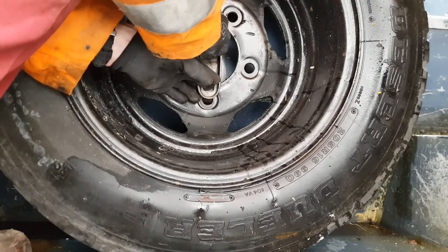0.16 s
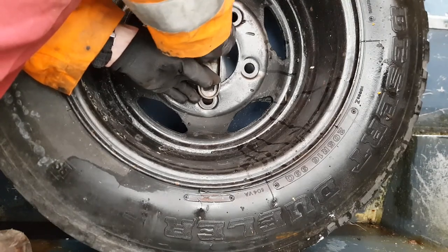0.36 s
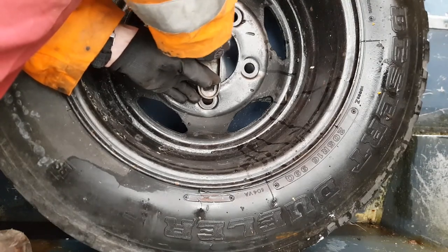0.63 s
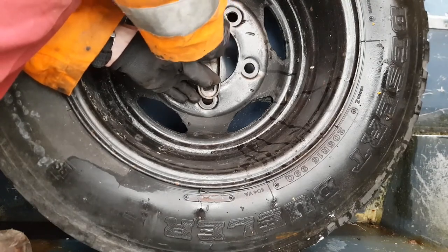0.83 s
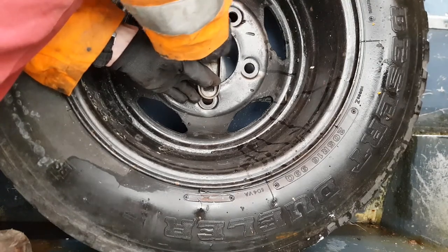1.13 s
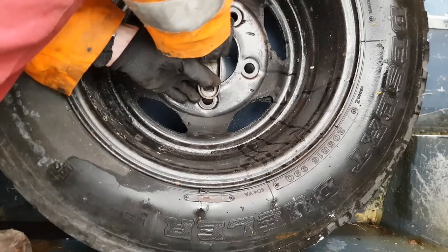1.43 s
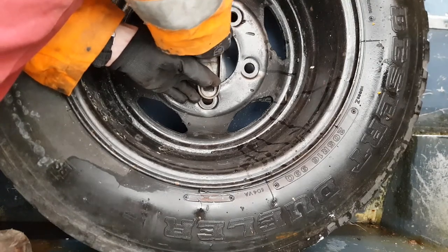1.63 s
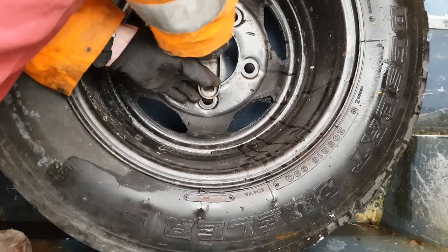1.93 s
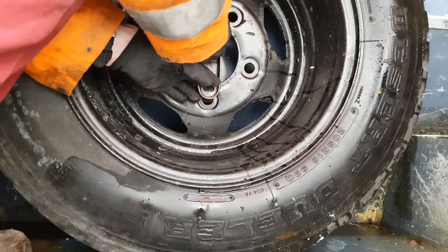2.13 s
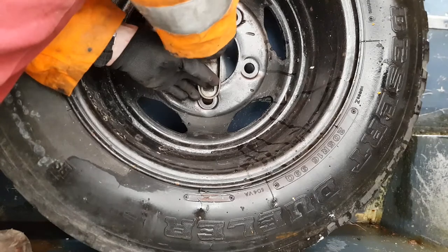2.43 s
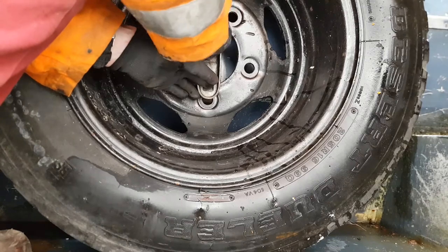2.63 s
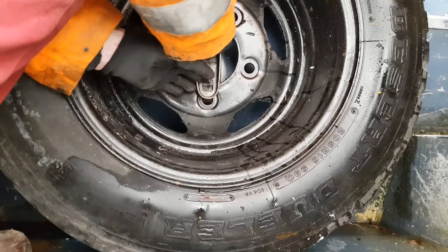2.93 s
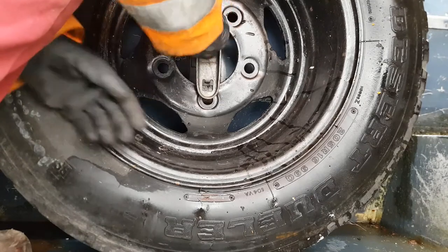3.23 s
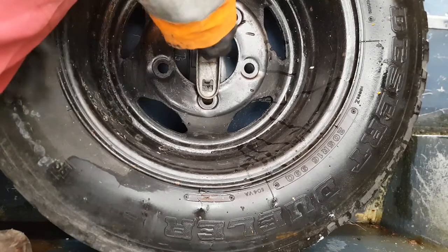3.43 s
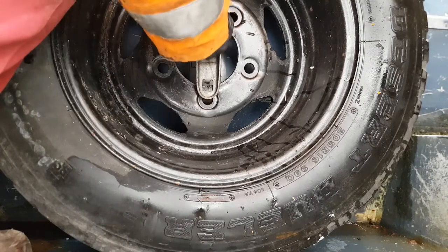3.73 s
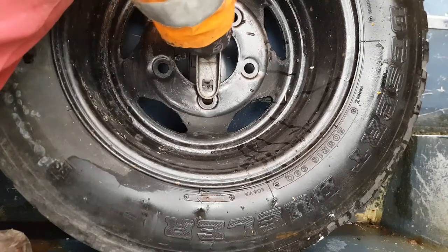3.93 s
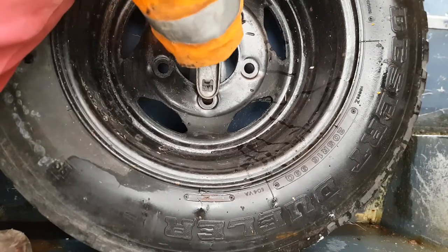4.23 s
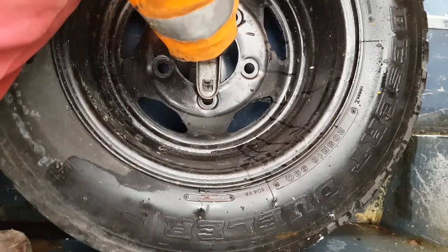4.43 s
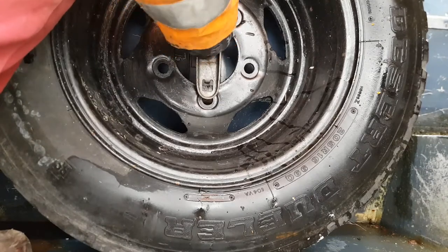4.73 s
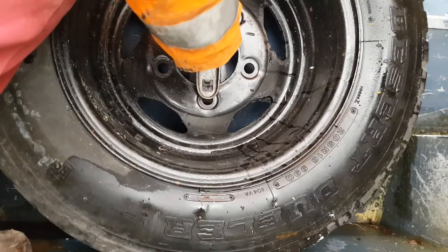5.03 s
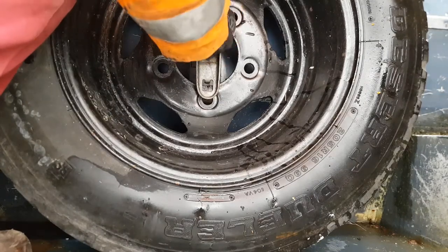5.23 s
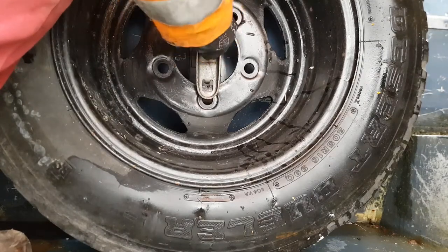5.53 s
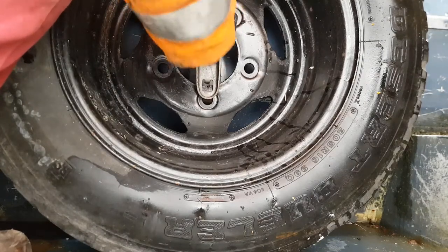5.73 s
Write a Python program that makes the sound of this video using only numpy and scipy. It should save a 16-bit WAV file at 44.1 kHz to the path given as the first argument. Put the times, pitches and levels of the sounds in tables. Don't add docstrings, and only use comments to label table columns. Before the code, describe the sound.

Outdoors, very close to a spare wheel, a loose metal bracket starts clattering at once against the steel rim. From 0 to about 2.3 seconds the clacks come quickly and unevenly, several per second, often in little clusters: short midrange metal rings with bright ticks on top, a hollow tyre hum and low judder underneath. Light glove and sleeve rubs run between. The rattle then stops; around 2.6 seconds a duller double thud booms low. At 3.1 seconds a brighter knock with a sharp grit crack lands, while cloth rustles broadly until about 3.6. Two heavy, rubbery thuds follow at 3.7 and 3.85, leaving a brief low hum. A soft thud and firmer one come at 4.4 and 4.5 with tiny gritty clicks, then a faint, dull pair near 5.3. Short reflections from the wheel dish follow the knocks; quiet low outdoor air remains beneath.

```python
import sys
import numpy as np
from scipy import signal
from scipy.io import wavfile
from scipy.ndimage import uniform_filter1d

SR = 44100
rng = np.random.default_rng(int(sys.argv[2]) if len(sys.argv) > 2 else 0)


def transcribe(u):
    v = np.clip(np.atleast_2d(u).T, -1, 1)
    q = np.round(v * 32767).astype(np.int16)
    wavfile.write(sys.argv[1], SR, q)


def magnitude_from_level(level_db):
    exponent = np.asarray(level_db, float) / 20
    return 10 ** exponent


N = 258867
STEP = 64
LEFT_LAG_S = 17 / SR


def evened(x):
    return x / np.sqrt(np.mean(x ** 2) + 1e-20)


def read(points, hz):
    f, value = np.transpose(points)
    return np.interp(np.log(hz + 1), np.log(f + 1), value)


def steady(points):
    return lambda hz, t: read(points, hz) + 0 * t


def diffuse(shape_db, patchy_db, size):
    # f/Hz, likeness [0 to 1]
    likeness = [(30, 1), (200, 0.64), (600, 0.17), (3000, 0.11), (15000, 0.033)]
    hop = size // 4
    frames, hz = N // hop + 5, np.fft.rfftfreq(size, 1 / SR)
    a, b, c, d, patches = rng.standard_normal((frames, len(hz), 5)).T
    patches = uniform_filter1d(patches, size=size // 64, axis=0)
    patches = evened(uniform_filter1d(patches, size=6000 // size + 2, axis=1))
    same = np.clip(read(likeness, hz), -1, 1)[:, None]
    left = a + 1j * b
    right = same * left + np.sqrt(1 - same ** 2) * (c + 1j * d)
    level_db = shape_db(hz[:, None], np.arange(frames) * hop / SR) + patchy_db * patches
    z = np.array([left, right]) * magnitude_from_level(level_db) * np.sqrt(2 * hop)
    return signal.istft(z / size * 4, nperseg=size, noverlap=size - hop)[1][:, :N]


def strokes(starts, holds, levels_db, rise_db, fall_db):
    t = np.arange(0, N + STEP, STEP) / SR - np.c_[starts]
    after = np.maximum(t - np.c_[abs(holds)], 0)
    return magnitude_from_level(np.c_[levels_db] + rise_db * np.minimum(t, 0) - fall_db * after)


def summed(rows, rest_db):
    gain = np.sqrt((rows ** 2).sum(0) + magnitude_from_level(rest_db) ** 2)
    return np.interp(np.arange(N) / STEP, np.arange(rows.shape[1]), gain)


def slips(per_s, spread_db):
    size = magnitude_from_level(spread_db * np.minimum(rng.exponential(1, N), 4)) * rng.choice([-1., 1.], N)
    return evened(size * (rng.random(N) < per_s / SR))


def blows(times, levels_db):
    out = np.zeros(N)
    out[np.round(np.asarray(times) * SR).astype(int)] = magnitude_from_level(levels_db)
    return out


def chatter(times, levels_db, lengths, rises):
    out, t = np.zeros(N), np.arange(5000) / SR
    for s, db, length, rise in zip(times, levels_db, lengths, np.clip(rises, .0001, .02)):
        shape = (1 - np.exp(-t / rise)) * np.exp(-t / np.clip(length, .001, .03))
        part = out[round(s * SR):][:len(t)]
        out[round(s * SR):][:len(t)] = np.hypot(part, magnitude_from_level(db) * shape[:len(part)] / shape.max())
    return out


def ring(drive, modes, lag_s, scatter, lean_db, fickle_db):
    out, steps = np.zeros((2, N)), np.arange(0, N + 1800, 1800)
    draws = rng.standard_normal((len(modes), len(steps) + 1))
    for (hz, db, t60), (chance, *luck) in zip(modes, draws):
        pole = np.exp((2j * np.pi * hz - np.log(1000) / max(t60, .01)) / SR)
        reach = np.interp(np.arange(N), steps, magnitude_from_level(db + fickle_db * np.array(luck)))
        swing = signal.lfilter([1], [1, -pole], drive * reach)
        left = magnitude_from_level(lean_db) * np.exp(1j * (scatter * chance - 2 * np.pi * hz * lag_s))
        out += np.imag([left * swing, swing])
    return out


def outdoor_air():
    # f/Hz, level/dB [per Hz]
    floor = [(15, -25), (25, 28), (71, 8.5), (222, -28), (266, -33), (405, -23), (515, -34), (832, -47),
             (1930, -32), (3000, -33), (3900, -66), (6600, -120)]
    return magnitude_from_level(-46) * evened(diffuse(steady(floor), 3.9, 2048))


def cloth():
    # t/s, hold/s, level/dB, brightness [dB per octave]
    rub_table = [(0.26, .01, -58.5, -4.5), (0.386, .01, -65, -3.5), (0.574, 0.047, -57.5, -2),
                 (0.713, .01, -61, -4), (0.864, 0.077, -57.5, -5), (1.046, 0.1, -64.5, -4),
                 (1.25, 0.032, -55.5, -5.5), (1.396, 0.017, -61.5, -1), (1.526, 0.017, -63, -9),
                 (1.702, 0.023, -61.5, -5), (1.877, 0.024, -52, -6), (2.0, 0.034, -62, -3),
                 (2.225, 0.046, -53.5, -2.5), (2.403, 0.082, -60.5, -1.2), (2.652, 0.077, -53, -1.5),
                 (2.84, 0.13, -59, -2), (3.035, 0.35, -47.5, -1.5), (3.435, 0.13, -43.5, -0.27),
                 (3.618, 0.28, -58, -2.5), (4.075, .05, -59, 0.5), (4.193, 0.092, -67.5, -2.5),
                 (0.072, 0.048, -67.5, -3), (4.32, 0.064, -62.5, -1.7), (4.535, 0.0083, -55.5, 1.5),
                 (4.615, 0.013, -70, -8), (4.8, 0.057, -59, 1.5), (5.14, 0.2, -67, -1.5),
                 (5.35, .1, -56, -2), (5.55, 0.13, -66, -0.5)]
    # f/Hz, level/dB [per Hz]
    fabric = [(150, -44), (250, 10), (347, -4.5), (413, 1), (491, -19.5), (798, -12), (1090, -12),
              (1390, -8.5), (1900, -8.5), (15700, -10)]
    # t/s, level/dB, length/s
    tick_table = [
        (0.268, -27.5, 0.0096),
        (0.545, -42, 0.0091),
        (0.98, -24, .012),
        (1.578, -31.5, 0.016),
        (4.341, -47, 0.01),
        (5.152, -58, 0.013),
        (5.576, -58, 0.033),
        (5.72, -48.5, 0.017),
    ]
    hush_db, hush_tilt_db = -70.5, 0.7
    s, hold, level_db, tilt_db = np.transpose(rub_table)
    rubs = strokes(s, hold, level_db, rise_db=197, fall_db=147.5)
    power, hush_power = rubs ** 2, magnitude_from_level(hush_db) ** 2
    tilt = (tilt_db @ power + hush_tilt_db * hush_power) / (power.sum(0) + hush_power)

    def tilted(hz, t):
        now = np.minimum(np.arange(len(t)), len(tilt) - 1)
        return read(fabric, hz) + tilt[now] * np.log2((hz + 300) / 12000)

    hiss = evened(diffuse(tilted, 1.9, 256))
    weave = 1 + 0.22 * evened(uniform_filter1d(slips(900, 1.9) ** 2, size=40))
    at, tick_db, length = np.transpose(tick_table)
    ticks = chatter(at, tick_db, length, 35 * length ** 2) * magnitude_from_level(-4.5)
    rubbing = summed(rubs, hush_db) * magnitude_from_level(7.5) * weave
    return hiss * (rubbing + ticks) * magnitude_from_level([[-.6], [.6]])


def grit():
    # t/s, level/dB
    snaps = [
        (3.137, -31),
        (4.3422, -31),
        (4.401, -40),
        (4.439, -42),
        (5.086, -43.5),
    ]
    decay_s, low_hz = 0.00048, 3000
    t = np.arange(400) / SR
    noise = rng.standard_normal(len(t)) + 0.36 * rng.standard_normal((2, len(t)))
    band = signal.butter(1, [low_hz, 3 * low_hz], "band", fs=SR, output="sos")
    puff = signal.sosfilt(band, noise) * np.exp(-t / decay_s)
    return signal.oaconvolve(blows(*np.transpose(snaps))[None], puff, axes=1)[:, :N]


def cavity():
    # t/s, length/s, f/Hz, first level/dB, last level/dB
    hums = [
        (2.331, .25, 250.4, -56, -59.5),
        (2.782, 0.18, 250, -44.5, -60.5),
        (3.583, 0.13, 234, -60, -54),
        (3.923, 0.28, 253.4, -43.5, -74),
        (4.189, 0.23, 237, -58, -50),
    ]
    out = np.zeros((2, N))
    for s, length, hz, first_db, last_db in hums:
        t = np.arange(0, length, 1 / SR)
        fade = signal.windows.tukey(len(t), .3) * magnitude_from_level(np.linspace(first_db, last_db, len(t)))
        tone = np.sin(2 * np.pi * hz * (t - np.c_[[LEFT_LAG_S, 0]]))
        out[:, round(s * SR):][:, :len(t)] = np.sqrt(2) * fade * tone
    return out


def dish(x):
    t = np.arange(6000) / SR
    signs = rng.choice([-1., 1.], (2, len(t)))
    taps = signs * (rng.random((2, len(t))) < .05) * magnitude_from_level(-60 * t / 0.11) * (t > .001)
    thin = signal.sosfilt(signal.butter(4, 520, "high", fs=SR, output="sos"), x.mean(0))
    return signal.oaconvolve(thin[None], taps / np.linalg.norm(taps[0]), axes=1)[:, :N]


def twists():
    # t/s, hold/s, carrier level/dB, tyre level/dB, rim level/dB
    pushes = [(0.0, 0.0017, -36.5, -21, -34.5), (0.201, 0.086, -41, -30.5, -40.5),
              (0.333, 0.023, -38.5, -36, -48), (0.534, 0.074, -36.5, -24, -37.5),
              (0.693, 0.0091, -56, -26, -69), (0.871, 0.055, -25.5, -19.5, -35.5),
              (0.958, 0.035, -33.5, -23.5, -40.5), (1.161, 0.082, -33.5, -29, -45.5),
              (1.247, 0.099, -47, -27.5, -43), (1.556, 0.037, -42, -20.5, -35),
              (1.861, 0.073, -19.5, -18, -41.5), (2.119, 0.033, -32.5, -49, -84),
              (2.216, 0.065, -19, -23.5, -46), (2.622, 0.066, -18.5, -23, -44),
              (2.698, 0.068, -25, -29, -48.5), (3.053, 0.55, -46, -54, -47), (3.152, 0.08, -20.5, -19, -45),
              (3.236, 0.033, -19.5, -18, -50), (3.74, 0.074, -22.5, -25, -46),
              (3.842, 0.051, -22, -28, -50.5), (4.423, 0.099, -23.5, -33, -52.5),
              (4.518, 0.096, -21, -34.5, -48.5), (5.273, 0.039, -28, -42, -55.5),
              (5.338, 0.099, -27.5, -39.5, -54)]
    # carrier, tyre, rim [dB/s]
    rises, falls = [1104, 698.5, 303], [330, 334, 226]
    # carrier, tyre, rim [dB]
    rests = [-57, -71.5, -75]
    s, hold, *parts_db = np.transpose(pushes)
    return [summed(strokes(s, hold, db, up, down), rest)
            for db, up, down, rest in zip(parts_db, rises, falls, rests)]


def contacts():
    # t/s, rim level/dB, tyre level/dB, bright plate level/dB
    knocks = [(0.002, -31, -30.5, -48), (0.177, -23, -23.5, -38), (0.244, -24.5, -25, -45),
              (0.27, -33, -26, -35.5), (0.358, -38.5, -32, -54.5), (0.47, -30, -18, -48.5),
              (0.525, -27.5, -29, -42.5), (0.548, -29.5, -29, -32), (0.618, -36.5, -38, -51.5),
              (0.68, -28.5, -21.5, -44.5), (0.802, -23, -20, -36.5), (0.878, -22, -21.5, -39.5),
              (0.981, -27.5, -40, -35), (1.154, -23, -20, -37), (1.191, -30, -26, -44.5),
              (1.236, -25.5, -24, -44), (1.281, -28, -39, -41), (1.342, -44, -36.5, -57),
              (1.473, -31, -22.5, -37), (1.537, -27, -26.5, -43), (1.568, -24, -42, -35.5),
              (1.78, -27, -20, -40), (1.833, -30, -34, -52), (1.861, -27.5, -42, -38.5),
              (1.913, -25.5, -17.5, -38.5), (1.985, -34.5, -29, -47), (2.131, -31.5, -18, -53.5),
              (2.187, -30.5, -23, -47), (2.217, -26.5, -19.5, -46), (2.265, -26, -22, -45.5)]
    # t/s, rim level/dB, tyre level/dB, bright plate level/dB
    thuds = [
        (2.025, -37.5, -29, -68),
        (2.601, -59, -29, -67),
        (2.615, -45, -23.5, -49.5),
        (3.134, -30, -21, -33.5),
        (3.721, -48, -15.5, -64),
        (3.853, -44, -13.5, -73),
        (4.414, -54, -35, -86.5),
        (4.528, -40, -19, -55),
        (5.261, -55, -38, -66),
        (5.355, -43, -28.5, -73),
    ]
    at, rim_db, tyre_db, plate_db = np.transpose(sorted(knocks + thuds))
    rise = 0.0021 * np.where(np.diff(at, prepend=-1) < .125, 3.2, 1.1)
    return at, rim_db, tyre_db, plate_db, np.full(len(at), 0.0078), rise


def carrier_judder(effort):
    # f/Hz, level/dB, t60/s
    modes = [(54.7, -27.5, 0.12), (64.8, 4, 0.27), (80.2, 3.5, 0.23), (90.9, 1.5, 0.27), (108.6, 1, 0.19),
             (128.2, -0.5, 0.35), (146.1, -1, 0.2), (187, -10, 0.23)]
    jolts = uniform_filter1d(slips(320, 1.5), size=110)
    return ring(effort * jolts * magnitude_from_level(-39.0), modes, 0.54 * LEFT_LAG_S, 0.025, 0.43, fickle_db=2.5)


def tyre_shake(effort, at, tyre_db, length, rise):
    thuds = chatter(at, tyre_db, length, 6.4 * rise) * magnitude_from_level(-40.5)
    shake = (effort * magnitude_from_level(-40.5) + thuds) * uniform_filter1d(slips(500, 2.5), size=30)
    first_blows = blows(at + 0.00398, tyre_db - 16)
    return shake + uniform_filter1d(first_blows, size=40)


def tyre_body(shake):
    # f/Hz, level/dB, t60/s
    modes = [(219, -58, 0.1), (225.9, 1, 0.29), (255.6, 0.5, 0.25), (273.5, 1.5, 0.2)]
    return ring(shake, modes, 0.52 * LEFT_LAG_S, 0.13, 0.82, fickle_db=3.5)


def loose_bracket(shake):
    # f/Hz, level/dB, t60/s
    modes = [(306.3, 0.5, 0.15), (350.2, -4.5, 0.24), (403, -3.5, 0.18), (437.7, -3.5, 0.2),
             (460, -93, 0.14)]
    # t/s, level/dB
    clamp = [
        (0, -1),
        (2.3, 1),
        (2.7, -4),
        (3.2, -12.5),
        (5.87, -2.5),
    ]
    loose = magnitude_from_level(np.interp(np.arange(N) / SR, *np.transpose(clamp)))
    return ring(shake * loose, modes, LEFT_LAG_S, 0.3, 0.17, fickle_db=3.0)


def steel_rim(effort, knocks):
    # f/Hz, level/dB, t60/s
    modes = [(605.4, -5.5, 0.22), (752, -1.5, 0.21), (843, -1, 0.092), (921, -6.5, 0.4), (1030, -3.5, 0.11),
             (1124, 6, 0.1), (1265, -35, 0.024), (1443, 7.5, 0.19), (1557, 0, 0.097), (1700, -12, 0.024),
             (1910, -33, 0.08), (2133, -8, 0.057), (2453, -11.5, 0.065), (2494, -3.5, 0.023),
             (2500, -33, 0.05), (3100, -32, 0.031)]
    drive = (effort * magnitude_from_level(-43) + knocks * magnitude_from_level(-41)) * slips(2500, 4.0)
    return ring(drive, modes, 0.00023, 0.93, -2.4, fickle_db=2.5)


def bright_plate(at, plate_db, length, rise):
    # f/Hz, level/dB, t60/s
    modes = [(3390, -6, .05), (3860, -9, .05), (4610, 0, .03), (5050, -7, .03), (5580, -10, .04),
             (6700, -9, .03), (7350, -10, .03)]
    taps = chatter(at, plate_db, length, 0.57 * rise) * magnitude_from_level(-26.5)
    return ring(taps * slips(3900, 3), modes, 0.00021, 1.0, -1.0, fickle_db=2.0)


def dense_steel(effort, at, rim_db, plate_db, length, rise):
    # f/Hz, level/dB [per Hz]
    grain_shape = [(290, -30), (500, -30), (595, -4), (664, -3.5), (748, 3.5), (816, -3), (948, -1),
                   (1800, -8), (2390, -10.5), (3300, -23), (4290, -32), (7260, -120)]
    # f/Hz, level/dB [per Hz]
    crack_shape = [(1470, -13.5), (2500, 8.5), (3690, -17), (4510, -2.5), (5190, -15), (6760, -6),
                   (10100, -24), (16000, -29)]
    grain = evened(diffuse(steady(grain_shape), 3.55, 512))
    grain *= chatter(at, rim_db, 2.2 * length, 0.8 * rise) * magnitude_from_level(-8.5) + effort * magnitude_from_level(-6.0)
    crack = evened(diffuse(steady(crack_shape), 2.5, 256))
    crack *= chatter(at, plate_db, 0.85 * length, 0.58 * rise) * magnitude_from_level(3.5) * magnitude_from_level([[-.7], [.7]])
    return grain + crack


def wheel():
    carrier_effort, tyre_effort, rim_effort = twists()
    at, rim_db, tyre_db, plate_db, length, rise = contacts()
    shake = tyre_shake(tyre_effort, at, tyre_db, length, rise)
    low = carrier_judder(carrier_effort) + tyre_body(shake) + loose_bracket(shake)
    rim = steel_rim(rim_effort, chatter(at, rim_db, length, rise))
    plate = bright_plate(at, plate_db, length, rise)
    dense = dense_steel(rim_effort, at, rim_db, plate_db, length, rise)
    return low + rim + plate + dense + cavity()


def scene():
    background = outdoor_air() + cloth() + grit()
    metal = wheel()
    return background + dish(metal) + metal


def low_pass(x):
    return signal.sosfilt(signal.butter(12, 16850, fs=SR, output="sos"), x)


def record(dry):
    heard = signal.sosfilt(signal.butter(6, 62, "high", fs=SR, output="sos"), dry)
    top_edge = signal.firwin(511, 15930, window=("kaiser", 9), fs=SR)
    heard = signal.oaconvolve(heard, top_edge[None], "same")
    return low_pass(heard)


dry = scene()
out = record(dry)
transcribe(out)
```